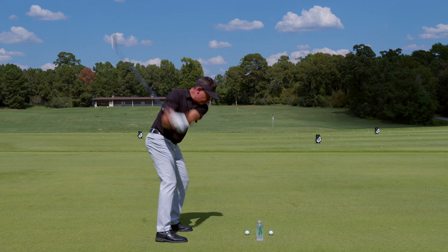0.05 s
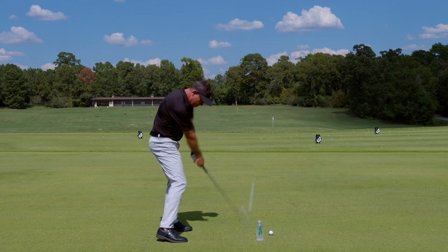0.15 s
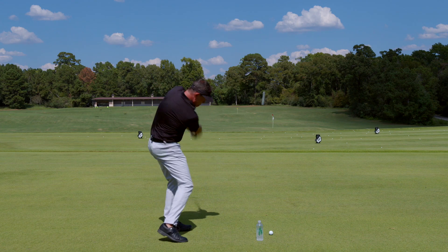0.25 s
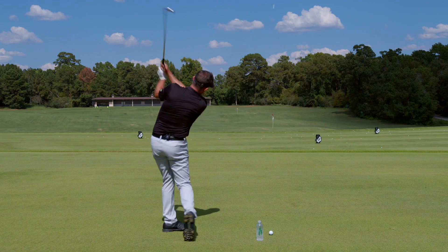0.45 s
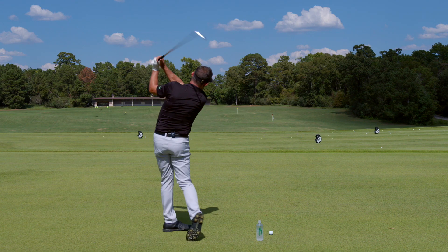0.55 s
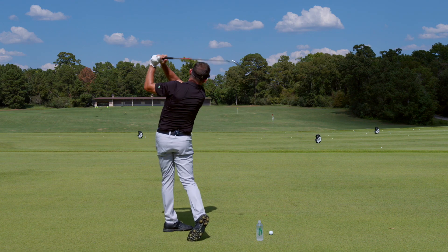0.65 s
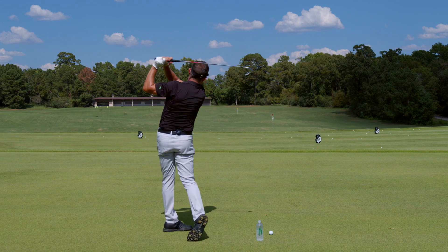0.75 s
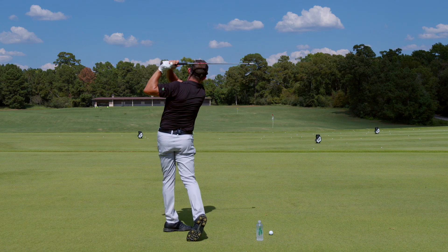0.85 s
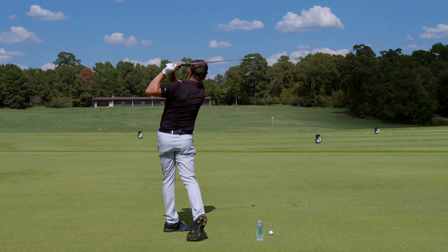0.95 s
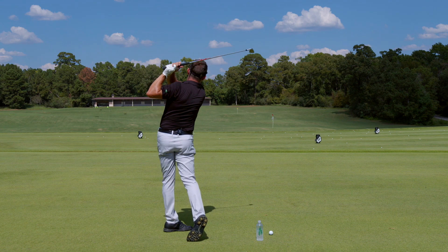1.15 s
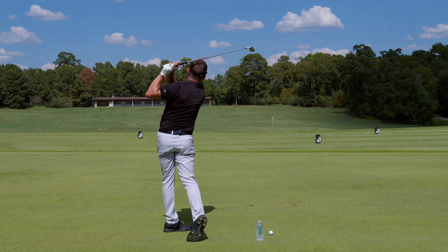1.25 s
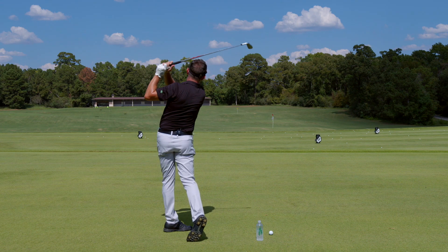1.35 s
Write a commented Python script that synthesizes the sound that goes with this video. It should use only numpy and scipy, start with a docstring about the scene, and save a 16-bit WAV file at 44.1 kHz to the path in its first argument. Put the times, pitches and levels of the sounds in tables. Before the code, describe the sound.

Close microphone on a golfer outdoors: cloth rustles and bumps, the club whooshes down, the ball is hit with a loud, slightly overloaded metallic clack, grass tears, then near quiet and a late sleeve rub.

```python
"""Cloth rustles and crinkles over air on the microphone and a far mower, then ticks as the body turns.
A golf iron whistles down, heard close to the golfer: wavering tones inside a swelling rush of noise.
The ball cracks, the club face rings for a few milliseconds and overloads the microphone; turf sprays.
Decaying sines make the knock and ring, coloured noise the cloth, air and turf, brief pulses the bumps.
More cloth ticks follow, and a sleeve slides near the end."""
import sys
import numpy as np
from scipy import signal
from scipy.fft import rfft, irfft
from scipy.io import wavfile
from scipy.ndimage import uniform_filter1d

SR = 44100
rng = np.random.default_rng(int(sys.argv[2]) if len(sys.argv) > 2 else 0)


def to_wav(s):
    """Save 16-bit WAV."""
    ch = np.atleast_2d(s).T  # columns
    pcm = np.round(np.clip(ch, -1, 1) * 32767)  # PCM
    wavfile.write(sys.argv[1], SR, pcm.astype(np.int16))


N = 61739  # length in samples
STRIKE_S = .2208  # moment of contact
BALL_PUSH_S = .00171  # rise time of the knock and the crack


def undb(db):
    """Decibels to gain."""
    return 10 ** (np.asarray(db) / 20)


def curve(rows):
    """Levels from (seconds, dB) rows, joined by straight lines in time."""
    rows = np.array(rows)
    return np.interp(np.arange(N) / SR, rows[:, 0], rows[:, 1])


def coloured(x, colour):
    """A signal given a spectrum, in dB over log frequency, and brought to unit RMS level."""
    hz, db = np.array(colour).T
    f = np.maximum(np.arange(N // 2 + 1) * SR / N, 1)
    gain = undb(np.interp(np.log(f), np.log(hz), db))
    y = irfft(rfft(x) * gain, N)
    return y / y.std()


def noise(colour):
    """Steady noise of unit RMS level with the given spectrum."""
    return coloured(rng.standard_normal(N), colour)


def walk(rate):
    """Smooth random wander of unit spread; a higher rate wanders faster."""
    k = max(int(SR / rate), 1)
    once = uniform_filter1d(rng.standard_normal(N), k)
    twice = uniform_filter1d(once, k)
    return twice / twice.std()


def burst(start, attack, t60):
    """Envelope with a smooth rise, then an exponential fall of 60 dB in t60 seconds."""
    age = np.maximum(np.arange(N) / SR - start, 0)
    rise = np.sin(np.pi / 2 * np.minimum(age / attack, 1)) ** 2
    return rise * np.exp(-np.log(1000) * np.maximum(age - attack, 0) / t60)


def thump(at, width):
    """A bell-shaped pressure pulse that leaks away through the microphone port."""
    port_hz = 130  # pressure leaks away below this
    pulse = np.exp(-.5 * ((np.arange(N) / SR - at) / width) ** 2)
    return signal.sosfilt(signal.butter(1, port_hz, "high", fs=SR, output="sos"), pulse)


def mower():
    """The far mower hums on multiples of one wavering pitch, each wandering in level."""
    # Each row: multiple of the pitch, average RMS level in dB.
    harmonics = [(1, -76.5), (2, -84), (4, -87), (5, -78.5), (6, -80), (7, -82), (8, -84), (10, -87),
                 (12, -86.5)]
    pitch_hz, waver = 129.3, 0.011  # waver is a fraction of the pitch
    turn = 2 * np.pi * np.cumsum(pitch_hz * (1 + waver * walk(6.8))) / SR
    hum = np.zeros(N)
    for multiple, db in harmonics:
        gain = np.sqrt(2) * undb(db + 2 * walk(8))
        hum += gain * np.sin(round(multiple) * turn + rng.uniform(0, 2 * np.pi))
    return hum


def field():
    """The quiet of the open course is a steady bed of coloured noise."""
    # Each row: frequency in Hz, relative level per Hz in dB.
    field_colour = [(15, -31.5), (25, -3), (50, 0.5), (96, -15), (119, -8.5), (260, -17), (433, -18.5),
                    (648, -15.5), (722, -24), (782, -11.5), (848, -18.5), (15500, -39)]
    field_db = -67.5
    return undb(field_db) * noise(field_colour)


def buffeting():
    """Air presses on the microphone as low noise whose level gusts around a drawn curve."""
    # Each row: time in seconds, level in dB.
    buffet_level = [(0, -78), (.07, -60.5), (.115, -61), (.145, -50), (.19, -53.5), (.23, -40.5),
                    (.26, -41), (.3, -53), (.36, -57.5), (.45, -62), (.6, -70.5), (1.25, -79.5),
                    (1.35, -63), (1.4, -68)]
    # Each row: frequency in Hz, relative level per Hz in dB.
    air_colour = [(8, -18), (25, -7), (45, -3), (80, -2.5), (140, -5.5), (300, -16), (800, -39),
                  (4000, -79)]
    gust_db, gusts_per_s = 1.5, 20
    return undb(curve(buffet_level) + gust_db * walk(gusts_per_s)) * noise(air_colour)


def shirt_rustle():
    """The shirt rubs as noise made grainy by a slow and a fast wander of its level."""
    # Each row: time in seconds, level in dB.
    rustle_level = [(0, -69.5), (.035, -51.5), (.075, -56), (.112, -47), (.125, -60.5), (.2, -54.5),
                    (.258, -52), (.295, -47.5), (.308, -54), (.326, -52.5), (.342, -63), (.39, -62.5),
                    (.42, -57.5), (.46, -66.5), (.495, -58), (.52, -69.5), (.66, -73), (.78, -78.5),
                    (1.2, -79.5), (1.3, -66), (1.357, -57), (1.4, -63)]
    # Cloth. Each row: frequency in Hz, relative level per Hz in dB.
    cloth_colour = [(60, -3), (200, 6.5), (600, 1.5), (1400, -1), (3000, -10), (6000, -16.5), (10000, -22),
                    (16000, -28)]
    return undb(curve(rustle_level) + 2 * walk(120) + 2 * walk(1500)) * noise(cloth_colour)


def crinkle():
    """Fibres under tension let go in a fine random scatter of tiny grains."""
    # Each row: time in seconds, level in dB.
    crinkle_level = [(0, -71.5), (.1, -64), (.15, -74.5), (.28, -64), (.33, -77.5), (.45, -79),
                     (.63, -72.5), (.75, -79), (.95, -81), (1.2, -89), (1.35, -74), (1.4, -75.5)]
    # Colour of the grains. Each row: frequency in Hz, relative level per Hz in dB.
    fibre_colour = [(300, -8), (1500, 1.5), (5000, 0.5), (10000, -4), (16000, -13)]
    grains_per_s = 2500
    grains = (rng.random(N) < grains_per_s / SR) * rng.standard_normal(N)
    return undb(curve(crinkle_level)) * coloured(grains, fibre_colour)


def cloth_ticks():
    """Cloth snaps: a low thump, a sharp leading edge and a short decaying crackle."""
    # Each row: time in seconds, thump level in dB, crackle level in dB, crackle t60 in seconds.
    tick_rows = [(0.0668, -29, -36.5, 0.02), (0.0997, -22, -39, 0.024), (0.1018, -42, -43, .014),
                 (0.1052, -37, -42.5, 0.0091), (.2425, -53, -42, 0.023), (.2488, -48, -41.5, 0.021),
                 (.2742, -35, -38.5, .018), (.2853, -28, -35, 0.015), (0.2945, -28, -40, .014),
                 (0.2987, -37, -48, .012), (0.4168, -54, -60.5, 0.026), (0.6261, -60, -66, 0.016),
                 (.729, -68, -60, 0.013), (.763, -50, -63.5, 0.014), (1.138, -64, -65, .012),
                 (1.252, -60, -62, .015), (1.269, -62, -61, .015), (1.292, -56.5, -58, 0.014)]
    # Each row: frequency in Hz, relative level per Hz in dB.
    crackle_colour = [(100, 0), (400, 4), (1200, 0.5), (3000, -3.5), (6500, -7), (8500, -10.5),
                      (12000, -8.5), (16000, -18)]
    tick_width_s, snap_width_s = 0.00018, .00004
    snap_db = 3  # the leading edge, over its crackle
    crackle = noise(crackle_colour) * undb(2 * walk(2000))
    ticks = np.zeros(N)
    for at, thump_db, crackle_db, t60 in tick_rows:
        ticks += undb(thump_db) * thump(at, tick_width_s)
        ticks += undb(crackle_db) * burst(at - tick_width_s, tick_width_s, t60) * crackle
        ticks += undb(crackle_db + snap_db) * thump(at, snap_width_s)
    return ticks


def squeaks():
    """Shoe or grip squeaks briefly: decaying sines roughened by a fast shared pitch wander."""
    # Each row: start in seconds, pitch in Hz, level in dB, t60 in seconds.
    squeak_rows = [(0.067, 4050, -49, 0.071), (0.095, 5700, -51, 0.016), (.658, 1800, -60.5, 0.034)]
    rise_s, roughness = 0.0012, 0.028  # roughness is a fraction of the pitch
    wobble = np.cumsum(1 + roughness * walk(1400)) / SR
    return sum(undb(db) * burst(at, rise_s, t60) * np.sin(2 * np.pi * hz * wobble)
               for at, hz, db, t60 in squeak_rows)


def microphone_bumps():
    """Cloth bumps and a low fluttering puff of air press on the microphone, each a pulse
    that first pulls the pressure down."""
    # Each row: time in seconds, pulse level in dB ahead of the port leak, half width in seconds.
    bump_rows = [(0.0921, -31.5, 0.0011), (0.1114, -28.5, 0.00034), (0.1327, -31, .0016),
                 (0.1451, -36, 0.0011), (0.1519, -39.5, 0.00058), (0.156, -35, 0.0021),
                 (0.2472, -16.5, 0.00019), (.3255, -31, 0.00029), (0.4364, -38.5, 0.00073),
                 (.574, -49, 0.00079), (1.3566, -33.5, 0.00016)]
    return -sum(undb(db) * thump(at, width) for at, db, width in bump_rows)


def swing():
    """Vortices shed by the club make short wavering whistles inside a rush of air."""
    # First the shaft and then the head cut the air.
    # Each row: peak in seconds, pitch in Hz, peak RMS level in dB, half length in seconds.
    whistle_rows = [(0.1762, 435, -41, .004), (0.196, 620, -37.5, .0035), (0.207, 590, -30.5, .0048),
                    (.22, 580, -35, .005)]
    # Rush of the club through the air. Each row: time in seconds, level in dB.
    rush_level = [(.13, -81), (.165, -56.5), (.185, -52.5), (.2, -42), (.212, -42), (.225, -45), (.26, -64),
                  (.29, -79.5)]
    # Air round the shaft. Each row: frequency in Hz, relative level per Hz in dB.
    swish_colour = [(100, -7), (330, 2.5), (700, -1), (1300, -4.5), (2500, -16), (7000, -22.5),
                    (15000, -36.5)]
    waver = 0.033  # fraction of the pitch
    t = np.arange(N) / SR
    wobble = np.cumsum(1 + waver * walk(200)) / SR
    whistles = np.zeros(N)
    for at, hz, db, length in whistle_rows:
        swell = np.exp(-.5 * ((t - at) / length) ** 2)
        tone = np.sin(2 * np.pi * hz * (wobble - np.interp(at, t, wobble)))
        whistles += np.sqrt(2) * undb(db) * swell * tone
    return whistles + undb(curve(rush_level)) * noise(swish_colour)


def ring(modes, start, push):
    """One row per mode: a sine that swells during the push and then dies away."""
    age = np.arange(N) / SR - start
    return np.array([undb(db) * burst(start, push, t60) * np.sin(2 * np.pi * hz * (push - age))
                     for hz, db, t60 in modes])


def strike():
    """Contact knocks ball and head, rings the face and cracks, with two near reflections."""
    # Low knock of ball and club head. Each row: frequency in Hz, level in dB, t60 in seconds.
    ball_modes = [(305, -25.5, .042), (497.4, -9.5, .0099), (1048, -8, .0178), (1290, 1.8, .0032),
                  (2020, -0.65, .0063), (2660, -8, .0109)]
    # Ring of the club face. Each row: frequency in Hz, level in dB, t60 in seconds.
    face_modes = [(4380, -4.0, 0.0066), (4320, -13, 0.0105), (4782, -12, 0.0105), (6160, -19, 0.011),
                  (6530, -23.0, 0.0161), (7520, -11, 0.0024), (8920, -25.5, 0.0021), (9873, -10, 0.0025),
                  (10877, -26, 0.006), (11707, -28.5, 0.0086), (13519, -21.5, 0.0044)]
    # Crack of the contact. Each row: frequency in Hz, relative level per Hz in dB.
    crack_colour = [(150, -5.5), (500, -1), (1500, -1.5), (3300, -6), (6000, -2), (9000, -4.5),
                    (15000, -8.5)]
    # From ground and body. Each row: delay in seconds, level in dB.
    reflections = [(.00279, -24), (.00578, -28)]
    face_lag_s, face_push_s = .00225, .00049  # the bright clack follows the knock
    crack_db, crack_t60_s = -22.5, 0.023
    t = np.arange(N) / SR
    knock = ring(ball_modes, STRIKE_S, BALL_PUSH_S).sum(axis=0)
    face = ring(face_modes, STRIKE_S + face_lag_s, face_push_s)
    # neighbouring modes in the table swing in opposite directions
    clack = sum((-1) ** k * mode for k, mode in enumerate(face))
    crack = undb(crack_db) * burst(STRIKE_S, BALL_PUSH_S, crack_t60_s) * noise(crack_colour)
    hit = knock + clack + crack
    echoes = sum(undb(db) * np.interp(t - lag, t, hit) for lag, db in reflections)
    return hit + echoes


def divot():
    """The sole thuds into the ground and tears the grass: a dull and a bright noise burst."""
    # Thud of the sole. Each row: frequency in Hz, relative level per Hz in dB.
    turf_colour = [(20, -4), (60, 1), (250, 2.5), (600, -1.5), (1200, -10), (2500, -24.5), (6000, -38.5),
                   (16000, -55)]
    # Torn grass. Each row: frequency in Hz, relative level per Hz in dB.
    spray_colour = [(500, -3), (2500, 0), (6000, -5), (11000, -7.5), (16000, -14)]
    turf_db, turf_t60_s = -37, .15
    spray_db, spray_t60_s = -47, .07
    thud = undb(turf_db) * burst(STRIKE_S, 0.0014, turf_t60_s) * noise(turf_colour)
    spray = undb(spray_db) * burst(STRIKE_S, .003, spray_t60_s) * noise(spray_colour)
    return thud + spray


def sleeve_slide():
    """The sleeve slides as the arms relax: brighter noise that swells late and flutters."""
    # Each row: time in seconds, level in dB.
    slide_level = [(1.2, -105), (1.285, -75.5), (1.31, -61), (1.348, -58.5), (1.37, -70), (1.4, -69)]
    # Sliding cloth. Each row: frequency in Hz, relative level per Hz in dB.
    sleeve_colour = [(500, -13.5), (1800, -6), (3200, 2.5), (5000, -9), (8000, -15.5), (15000, -25)]
    return undb(curve(slide_level) + 1.5 * walk(300)) * noise(sleeve_colour)


def scene():
    """All sources at one microphone."""
    outdoors = mower() + field() + buffeting()
    clothing = shirt_rustle() + crinkle() + cloth_ticks() + sleeve_slide()
    club = swing() + strike() + divot()
    return (outdoors + clothing + squeaks() + microphone_bumps() + club)[None]


def record(dry):
    """Overload rounds off the peaks toward full scale, and a steep low-pass cuts the top."""
    drive_db, top_hz = 0.17, 16300
    driven = undb(drive_db) * dry
    held = driven / (1 + driven ** 6) ** (1 / 6)
    # order 8, ripple .2 dB below the cut, 70 dB down above it
    return signal.sosfilt(signal.ellip(8, .2, 70, top_hz, fs=SR, output="sos"), held)


dry = scene()
out = record(dry)
to_wav(out)
```